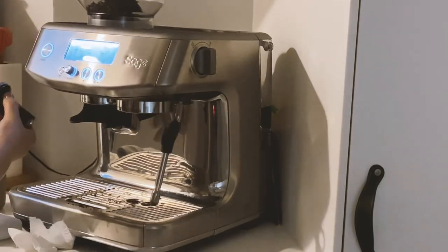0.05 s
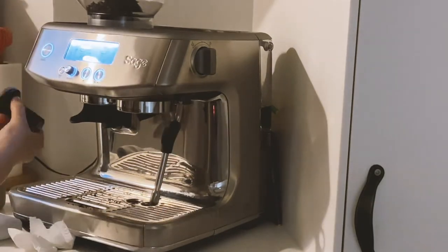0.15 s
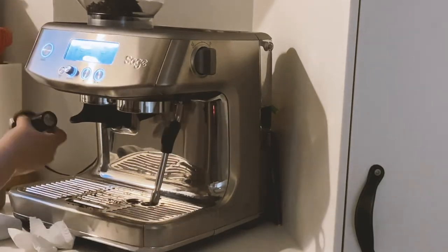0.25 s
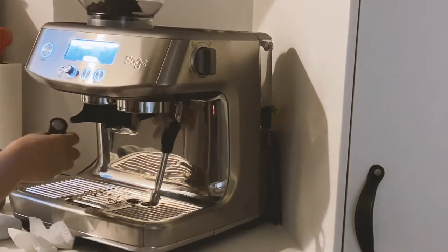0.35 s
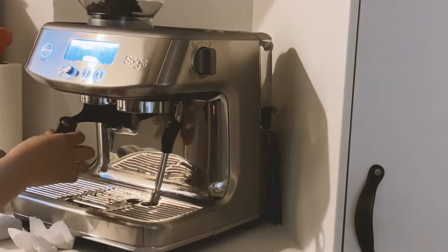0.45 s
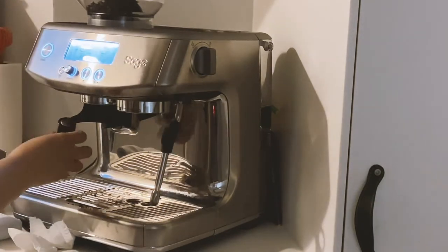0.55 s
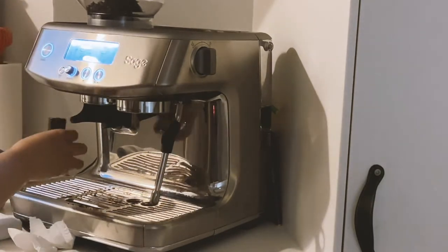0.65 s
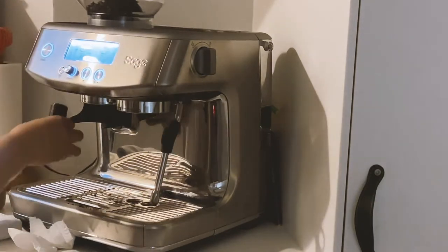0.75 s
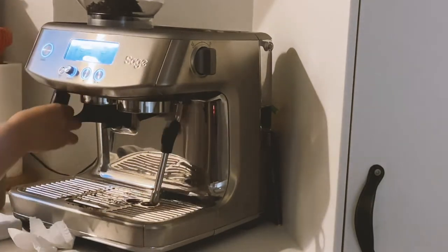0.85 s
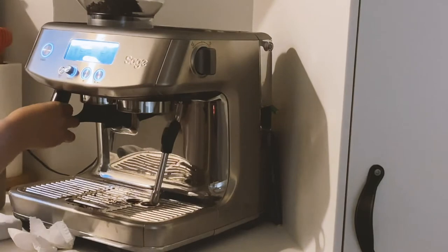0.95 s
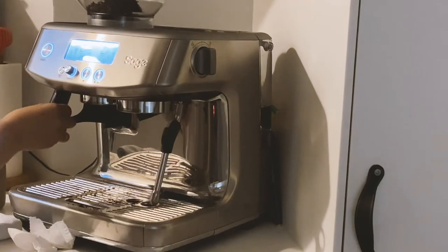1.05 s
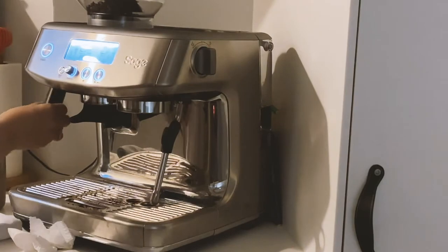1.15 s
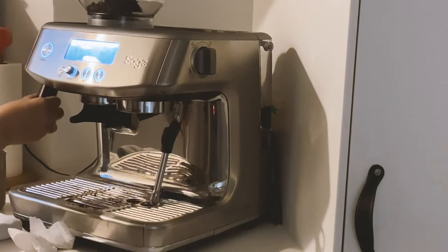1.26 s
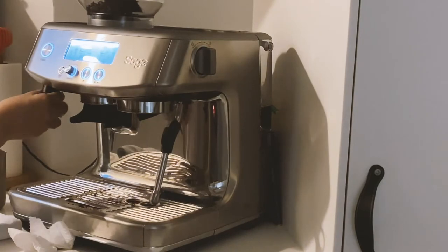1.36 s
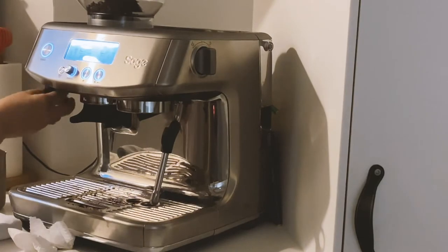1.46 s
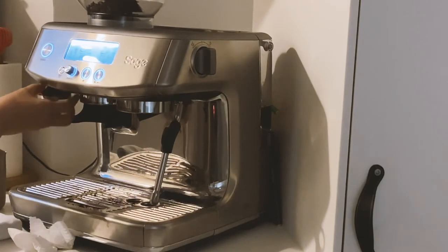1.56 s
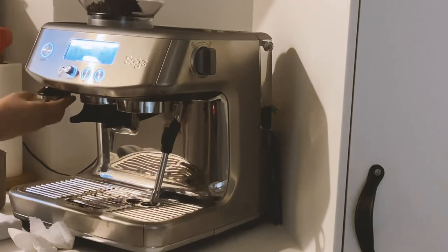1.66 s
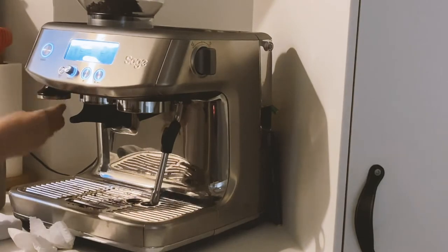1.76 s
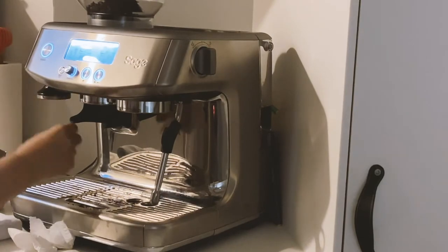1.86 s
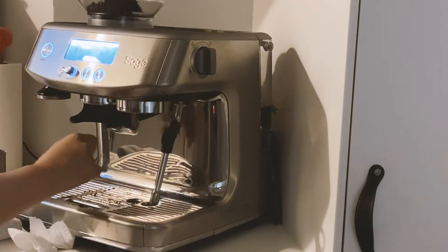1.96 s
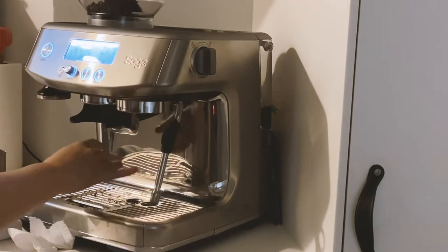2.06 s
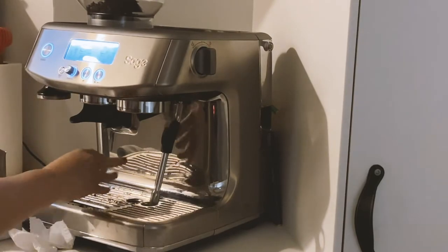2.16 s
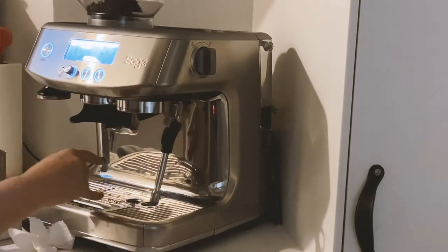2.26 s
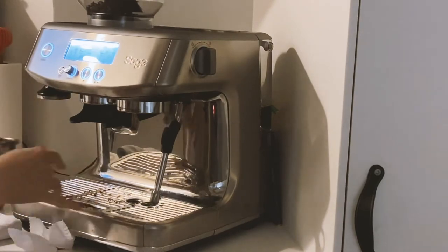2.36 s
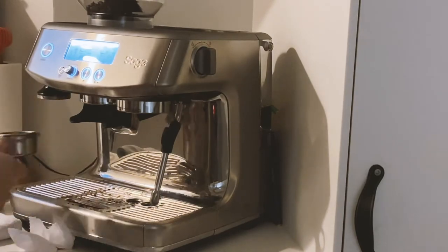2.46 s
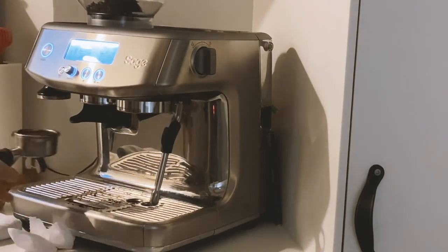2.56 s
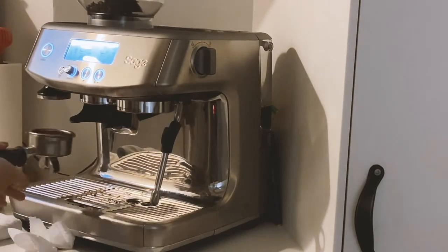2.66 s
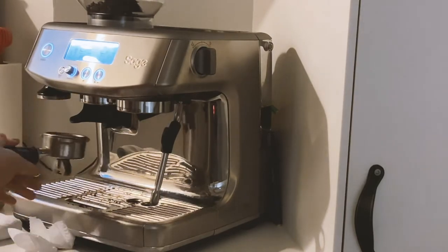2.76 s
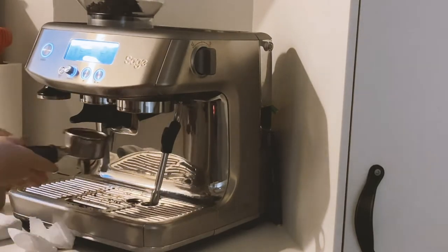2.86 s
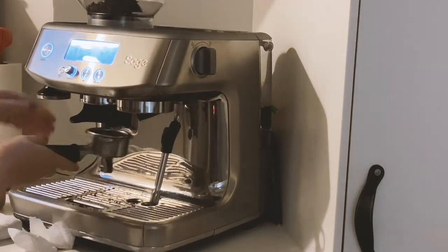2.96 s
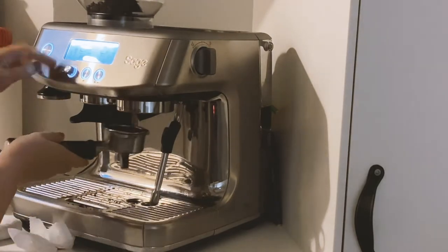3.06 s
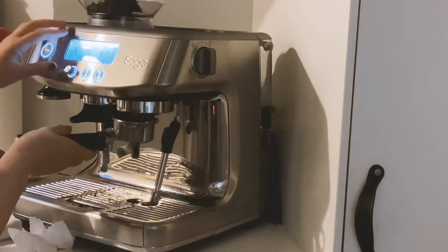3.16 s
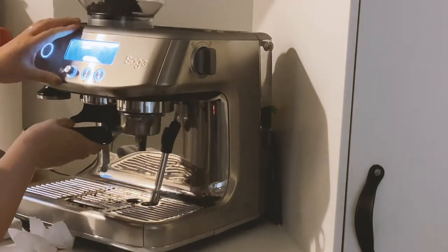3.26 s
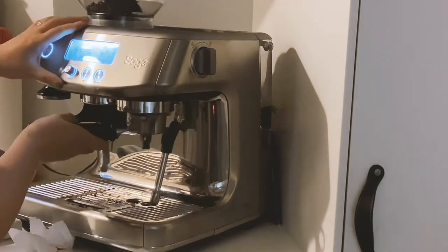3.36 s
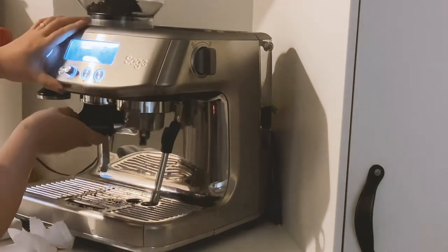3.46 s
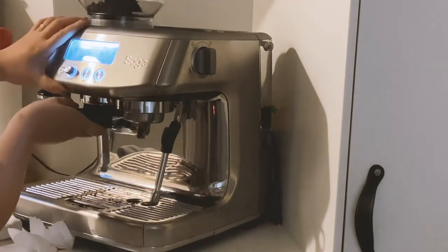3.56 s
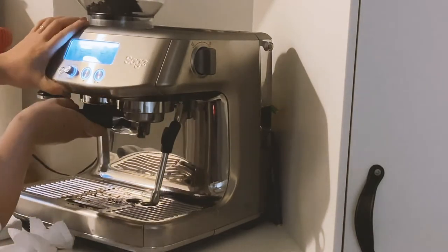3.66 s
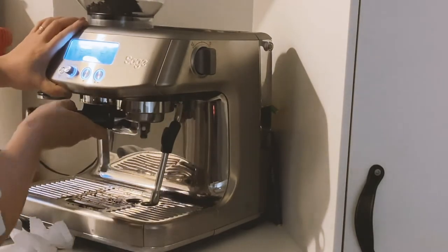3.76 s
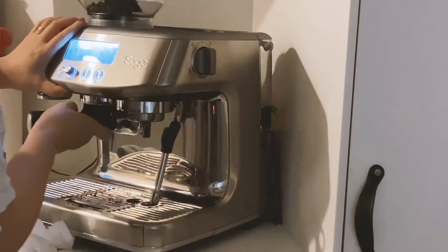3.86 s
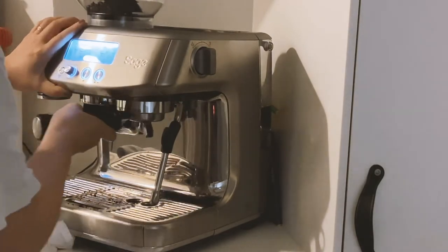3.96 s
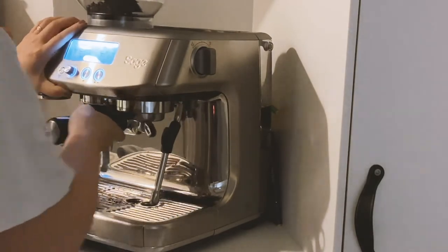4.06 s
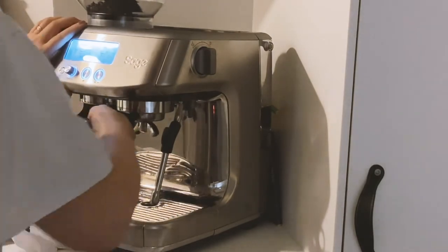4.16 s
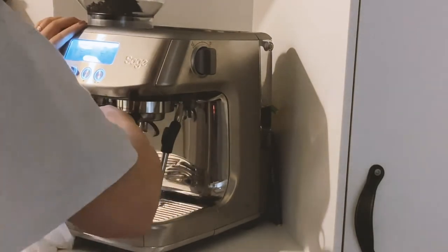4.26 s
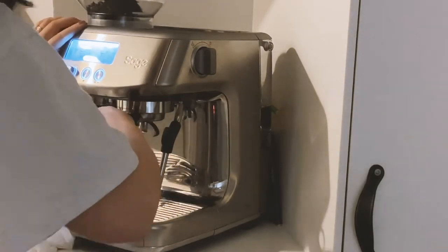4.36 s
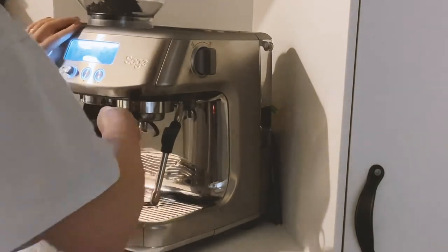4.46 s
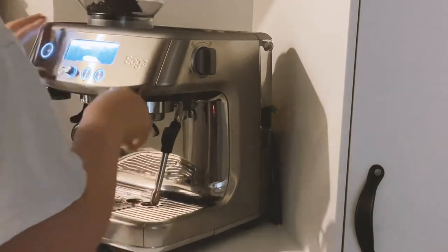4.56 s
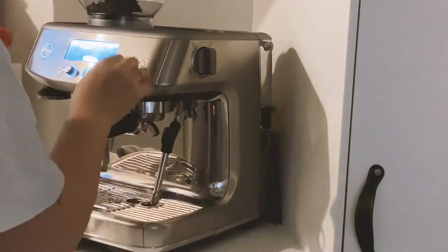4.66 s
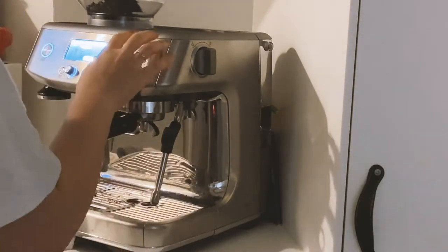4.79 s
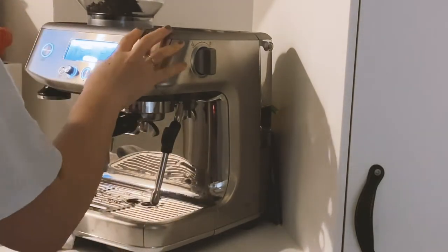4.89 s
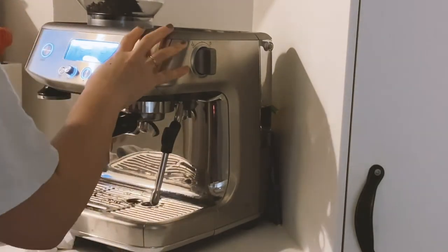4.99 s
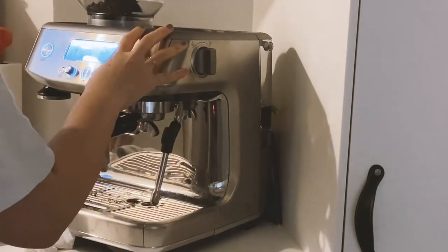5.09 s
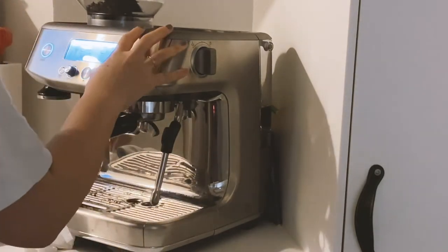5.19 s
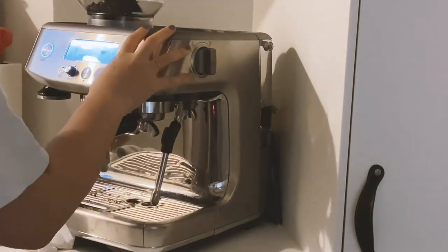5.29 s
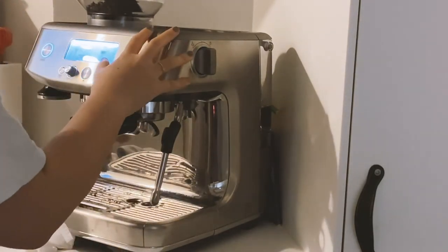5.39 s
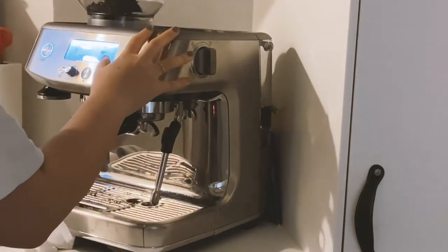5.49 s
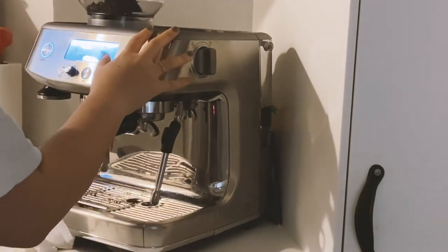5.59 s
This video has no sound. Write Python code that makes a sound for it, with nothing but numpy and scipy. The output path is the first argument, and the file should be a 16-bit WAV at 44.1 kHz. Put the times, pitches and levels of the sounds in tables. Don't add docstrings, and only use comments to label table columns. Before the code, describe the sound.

Hollow metallic knocks, a short rattling scrape, small rubber squeaks and a button click at an espresso machine, above a steady low compressor hum.

```python
import sys
import numpy as np
from scipy import signal
from scipy.fft import rfft, irfft
from scipy.io import wavfile
from scipy.ndimage import uniform_filter1d

SR = 44100
rng = np.random.default_rng(int(sys.argv[2]) if len(sys.argv) > 2 else 0)


def level_to_linear(level):
    exponent = np.asarray(level, float) / 20
    return 10 ** exponent


def int16_out(signal):
    q = np.round(np.clip(np.atleast_2d(signal).T, -1, 1) * 32767)
    wavfile.write(sys.argv[1], SR, q.astype(np.int16))


N = 248283
T = np.arange(N) / SR
HZ = np.fft.rfftfreq(N + SR, 1 / SR)


def unit(x):
    return x / np.sqrt(np.mean(x ** 2))


def band(x, lo_hz, hi_hz, order=2):
    return signal.sosfilt(signal.butter(order, [lo_hz, hi_hz], "band", fs=SR, output="sos"), x)


def walk(rate_hz):
    k = int(SR / rate_hz)
    return unit(uniform_filter1d(uniform_filter1d(rng.standard_normal(N), k), k))


def grains(rate_hz, spread_db):
    clicks = (rng.random(N) < rate_hz / SR) * rng.standard_normal(N)
    return unit(clicks * level_to_linear(spread_db * rng.exponential(size=N)))


def strokes(rows, rel=False):
    roundness = 1.1
    t, out = T[::16], 0
    for s, rise_s, fade_s, db, *more in rows:
        away = np.abs(t - s) / np.where(t < s, rise_s, fade_s)
        level_db = db + (more[0] if rel else 0)
        out = out + level_to_linear(level_db) * np.exp(-away ** roundness)
    return np.interp(T, t, out)


def hum():
    # t/s, shaft rate f/Hz, level/dB, lean to even orders/dB
    shaft = [(0, 22.39, -2.5, 13.5), (.6, 21.82, -0.5, 8), (1.2, 21.23, 3.5, 5), (1.7, 21.47, -1.5, -4),
             (2.399, 21.46, 0.5, -2), (3.0, 21.16, -0.5, -5.5), (3.799, 20.58, 2.5, 2.5),
             (4.1, 20.7, -2, -8), (4.6, 21.28, -2, -4), (5.0, 20.68, -0.5, -1.5), (5.63, 20.96, -12.5, -4)]
    # order, level/dB, share of lean
    orders = [(2, -61.5, 0.86), (3, -54.5, -0.82), (4, -59, .5), (5, -75, 0.01), (6, -63.5, 0.22),
              (7, -68.5, -0.29), (9, -75.5, -0.26), (10, -80.5, -0.81)]
    # t/s, rise/s, fade/s, level/dB
    swell = [
        (4.2, 0.55, 0.48, -80),
    ]
    steady_whine_db = -92
    s, *columns = np.transpose(shaft)
    hz, level_db, lean_db = (np.interp(T, s, c) for c in columns)
    phase = 2 * np.pi * np.cumsum(hz) / SR
    lines = 0
    for k, db, share in orders:
        line_db = db + level_db + share * lean_db + 2.2 * walk(16)
        lines = lines + np.sqrt(2) * level_to_linear(line_db) * np.cos(np.round(k) * phase + 0.91 * walk(0.93))
    whine_level = level_to_linear(steady_whine_db + level_db) + strokes(swell)
    return lines + whine_level * unit(band(rng.standard_normal(N), 2080, 2300))


def air():
    # f/Hz, density/dB per Hz
    spectrum = [(12, -39.5), (20, -6.5), (49, 1.5), (81, -6), (150, -20.5), (270, -33), (660, -42.5),
                (1400, -46.5), (1810, -51), (2390, -46.5), (3250, -51), (7310, -56), (8890, -61.5),
                (11100, -58), (16000, -78.5)]
    hz, db = np.transpose(spectrum)
    colour = level_to_linear(np.interp(np.log(HZ + 1), np.log(hz), db))
    noise = irfft(rfft(rng.standard_normal(N + SR)) * colour, N + SR)[:N]
    return level_to_linear(-50.5 - 4.0) * unit(noise)


def ring(modes, chance, damp, crack, spread, rise_s, tilt_db=0):
    t = T[:SR // 5]
    hz, width_hz, db = np.array(modes, float).T[:, :, None]
    db = db + tilt_db * np.log2(hz / hz.mean())
    sign = (-1.) ** np.arange(len(modes))[:, None]
    detune, strength = chance[:, :len(modes), None]
    hz = hz * (1 + .015 * detune)
    waves = sign * level_to_linear(db) * np.sin(2 * np.pi * hz * t)
    tones = level_to_linear(2.5 * strength) * waves * np.exp(-np.pi * damp * width_hz * t)
    contact = waves * np.exp(-np.pi * spread * width_hz * t)
    swell = (1 - np.exp(-t / rise_s)) ** 2
    y = unit(tones.sum(axis=0) * swell) + crack * unit(contact.sum(axis=0) * swell)
    return y / np.sqrt(np.sum(y ** 2))


def thump(chance):
    # f/Hz, width/Hz, level/dB
    counter_modes = [
        (89, 19, -7),
        (145.9, 30, -1.5),
    ]
    return level_to_linear(24) * ring(counter_modes, chance, damp=1.0, crack=0.77, spread=1.0, rise_s=.005)


def blows(events, casing, clack, tick, weight_db):
    # f/Hz, width/Hz, level/dB
    edge_modes = [(11100, 370, 2.5), (11940, 170, -8), (12450, 950, -5.5), (13860, 158, -10),
                  (15660, 350, -1.5)]
    out = np.zeros((4, N + SR))
    for s, casing_db, clack_db, tick_db, top_db in events:
        chance = rng.standard_normal((2, 8))
        low = level_to_linear(weight_db) * thump(chance)
        top = level_to_linear(24.5 + top_db) * ring(edge_modes, chance, damp=1.0, crack=5.3, spread=7.4, rise_s=.00008)
        body = level_to_linear(19.5) * ring(casing, chance, damp=1.0, crack=0.96, spread=2.9, rise_s=0.0018)
        hardness_db = 0.17 * (tick_db - clack_db + 15)
        panel = level_to_linear(21.5 + clack_db) * ring(clack, chance, damp=1.0, crack=1.4, spread=6.1, rise_s=0.00025,
                                            tilt_db=hardness_db)
        steel = level_to_linear(21 + tick_db) * ring(tick, chance, damp=.9, crack=1.6, spread=5.0, rise_s=.0002)
        start = int((s - .002) * SR)
        out[:, start:start + len(low)] += level_to_linear(casing_db) * np.array([low + top, body, panel, steel])
    return out[:, :N]


def struck_parts():
    # t/s, casing/dB, clack rel/dB, tick rel/dB, top rel/dB
    tamper = [
        (0.798, -17, -8, -21, -29.5),
        (1.413, -16, -7, -7.5, -9.5),
        (1.44, -30.5, -1, -23, -20.5),
    ]
    basket = [(2.948, -38.5, 0.5, -2, -2), (3.131, -18, -13.5, -27.5, -32), (3.238, -31.5, -38, -27, -28),
              (3.284, -18.5, -14.5, -32, -40), (3.374, -22.5, -24, -28.5, -34.5),
              (3.408, -20, -15.5, -23.5, -34), (3.458, -40.5, -27, -31, -22), (3.697, -30, -15.5, -29, -41),
              (3.756, -54, -1, 0, -4), (3.847, -42.5, -0.5, -6, -22), (3.872, -63, -10, -24, 3),
              (3.965, -47.5, -2.5, -3, -2.5), (4.066, -53.5, 8, 1, -5), (4.082, -49.5, -1, 7, -1.5),
              (4.245, -73, 1, -13, -19.5), (4.272, -72, -12, -17, -13)]
    button = [
        (0.766, -65.5, -0.5, -26, -40),
        (4.953, -38, -18.5, -60, -54.5),
        (5.107, -25.5, -7, -23, -8),
    ]
    slot = [(1.139, -40.5, 1, -28, -45.5), (1.154, -35, -5, -32.5, -45), (1.184, -31.5, -3, -41, -49),
            (1.23, -23, 0.5, -28, -38), (1.293, -26.5, -6, -38.5, -46.5), (1.312, -33, -3, -37, -46.5),
            (1.347, -34, -10, -31, -40.5)]
    latch = [
        (5.044, -52, 11, -6.5, -14),
    ]
    # f/Hz, width/Hz, level/dB
    casing = [
        [(252.4, 19, -8.5), (325, 19, -10), (437, 33, 0.5), (566.7, 18, -1.5), (630, 28, 7), (634.6, 45, 11.5),
         (773, 20, -12)],
        [(232, 12, -14), (286.8, 19.2, -2.5), (314.3, 25.5, 0), (364, 32, 1), (446, 25, -3),
         (473.6, 6.2, -13.5), (559, 22.5, -5), (690.6, 23, -12)],
        [(270, 36.5, 0), (367, 40, -2), (433.6, 24, 0.5), (490, 30, -19), (558, 30, -0.5), (690, 74, -2.5)],
    ]
    clack = [
        [(935, 36, 1.5), (1090, 54, 4.5), (1370, 75, 0.5), (1667, 50, -3.5), (2020, 53, -1), (2460, 55, -2),
         (2660, 45, -10.5), (3030, 94, -7)],
        [(760, 96, 2.5), (984, 78, 5.5), (1121, 95, 5), (1630, 130, -3), (1970, 180, 0), (2800, 210, -12)],
        [(753, 117, -13.5), (1136, 69, -1), (1800, 175, -2), (2205, 90, 1), (2540, 150, -1), (3174, 60, -7),
         (4020, 86, -10)],
    ]
    tick = [
        [(3770, 210, -1.5), (4460, 250, -5), (5210, 248, -1.5), (6030, 250, -0.5), (7200, 250, -1),
         (8450, 180, -2)],
        [(3350, 394, 1.5), (4490, 260, -2.5), (5670, 460, 2), (6790, 340, -1.5), (8900, 410, 4.5)],
        [(4800, 262, -4), (6020, 320, 5), (7335, 510, 1.5), (8000, 430, -1)],
    ]
    # f/Hz, width/Hz, level/dB
    slot_clack = [(1006, 32, -1.5), (1159, 15, -7.5), (1380, 54, -3), (1700, 43, -2), (1890, 36, -10.5),
                  (2080, 37, -9), (3550, 36, -25.5)]
    latch_clack = [(1150, 140, -6.5), (1670, 170, -7.5), (2640, 160, 0.5), (3150, 180, -2), (3720, 165, -3),
                   (4040, 150, -6)]
    weight_db = [
        -22,
        -9,
        -8.5,
    ]
    struck = [*zip([tamper, basket, button], casing, clack, tick, weight_db),
              (slot, casing[0], slot_clack, tick[0], -20),
              (latch, casing[2], latch_clack, tick[2], -12)]
    return sum(blows(*part) for part in struck)


def slides():
    # hardest t/s, rise/s, fade/s, drag level/dB, brightness rel/dB
    drags = [(.79, .006, 0.0054, -51.5, 7), (1.125, 0.022, .03, -39.5, -11.5), (1.19, 0.022, 0.01, -50, 17),
             (1.26, 0.034, 0.063, -35.5, -0.5), (1.4, 0.02, .006, -32.5, -5.5), (2.35, .2, 0.13, -79, 9.5),
             (3.23, .02, 0.048, -47, -3.5), (3.42, 0.027, 0.012, -30.5, -1), (3.56, .04, 0.03, -79, 3.5),
             (3.715, 0.0037, 0.048, -51, 2), (3.9, 0.063, 0.058, -57.5, 6.5),
             (4.09, 0.05, 0.029, -54.5, 9.5), (4.17, 0.033, .08, -75, 11.5), (4.32, 0.046, 0.05, -68.5, 0),
             (4.965, 0.011, 0.042, -46, -40), (5.08, 0.045, 0.01, -55, 9), (5.24, 0.15, 0.029, -47.5, -2.5)]
    slips = grains(450, 2.6)
    dull = level_to_linear(-6.5) * strokes(drags) * unit(band(slips, 300, 900, order=3))
    bright = level_to_linear(-10.5) * strokes(drags, rel=True) * unit(band(slips, 800, 2400, order=3))
    return dull + bright


def rustle():
    # hardest t/s, rise/s, fade/s, level/dB, duller part rel/dB
    brushes = [(1.15, 0.11, 0.032, -78, -8), (1.385, 0.051, 0.019, -56, 9.5), (1.655, 0.0049, .02, -81, 8),
               (1.734, 0.018, .015, -61, -9), (1.806, 0.01, 0.038, -62.5, -0.5),
               (1.982, 0.053, 0.018, -60.5, 1), (2.105, .012, 0.14, -71.5, -1.5),
               (2.56, .08, .1, -86.5, -6), (2.695, 0.011, 0.11, -79, -9.5), (3.56, 0.0071, 0.14, -71, 7),
               (3.78, 0.13, .03, -66, 12), (3.872, 0.0023, 0.0024, -38.5, 8.5),
               (3.963, .015, 0.046, -79, 3), (4.084, .012, .035, -77, 3), (4.384, 0.056, 0.013, -60, 3),
               (4.81, 0.014, .04, -63, 2.5), (5.25, 0.05, 0.041, -64, 8.5)]
    fibres = grains(6000, 2.5) * level_to_linear(1.5 * walk(25))
    crisp = level_to_linear(0.5) * strokes(brushes) * unit(band(fibres, 8000, 20000))
    dull = level_to_linear(-11.5) * strokes(brushes, rel=True) * unit(band(fibres, 2130, 10000))
    return crisp + dull


def thuds():
    # t/s, level/dB
    rocks = [
        (1.415, -25),
        (1.438, -47),
        (3.236, -33.5),
        (3.406, -25.5),
        (3.458, -41.5),
        (3.517, -59),
        (3.698, -46),
        (4.271, -53),
        (4.788, -52.5),
        (4.953, -46),
    ]
    pushes = np.zeros(N)
    for s, db in rocks:
        pushes[int((s - .002) * SR)] = level_to_linear(db)
    return signal.fftconvolve(pushes, thump(np.zeros((2, 2))))[:N]


def squeaks():
    # hardest t/s, fade/s, slip rate f/Hz, level/dB, overtones rel/dB
    slips = [(3.633, .006, 1800, -82, 11), (3.654, 0.012, 1900, -62.5, -1), (3.69, .01, 2030, -78, 14),
             (3.838, 0.0052, 2330, -48, -8), (3.858, 0.011, 2490, -46, -14),
             (3.899, 0.016, 2246, -44.5, -16), (3.945, .012, 2530, -59, -18),
             (4.005, .022, 2486, -51.5, -15.5), (4.062, 0.0063, 2458, -55, -18)]
    rise_per_fade = 0.94
    rows = np.array(slips)
    haste = np.interp(T, [3.72, 3.82, 3.95, 3.98], [.02, .037, .034, .016])
    slip_hz = np.interp(T, rows[:, 0], rows[:, 2]) * (1 + haste * walk(220))
    phase = 2 * np.pi * np.cumsum(slip_hz) / SR
    levels = [(s, rise_per_fade * fade_s, fade_s, db, rel_db) for s, fade_s, hz, db, rel_db in slips]
    overtones = sum(level_to_linear(db) * np.sin(k * phase) for k, db in enumerate([0.5, -5, -13], 2))
    strands = haste / haste.max() * (level_to_linear(-5) * np.sin(1.17 * phase) + level_to_linear(-12) * np.sin(.83 * phase))
    chatter = level_to_linear(4.5 * walk(90))
    return chatter * (strokes(levels) * (np.sin(phase) + strands) + strokes(levels, rel=True) * overtones)


def kitchen(x):
    # f/Hz, t60/s
    room = [(100, .45), (400, 0.44), (1500, 0.5), (5000, 0.53), (12000, 0.32)]
    room_hz, room_t60_s = np.transpose(room)
    t, tail = T[:SR * 2 // 3], 0
    for hz in 70 * 2 ** np.arange(0, 8, .5):
        t60_s = np.interp(np.log(hz), np.log(room_hz), room_t60_s)
        late = np.exp(-np.log(1000) * t / t60_s) / np.sqrt(t60_s)
        alcove = 0.66 * np.exp(-np.log(1000) * t / 0.1)
        echoes = band(rng.standard_normal(SR), hz / 2 ** 0.36, hz * 2 ** 0.3)[-len(t):]
        evenness = uniform_filter1d(echoes ** 2, size=int(8 * SR / hz)) / np.mean(echoes ** 2)
        tail = tail + echoes * evenness ** -.4 * (late + alcove)
    tail = tail * (1 - np.exp(-t / 0.0011))
    tail = tail / np.sqrt(np.sum(tail ** 2))
    tail[0] += level_to_linear(-6.2)
    return signal.fftconvolve(x, tail)[:N]


def scene():
    counter, *knocks = struck_parts()
    rubbing = slides() + squeaks() + rustle()
    in_room = sum(kitchen(part) for part in [counter + thuds(), *knocks, rubbing])
    return (in_room + hum() + air())[None]


def top_cut(x):
    return signal.sosfilt(signal.butter(12, 16650, fs=SR, output="sos"), x)


def record(dry):
    # f/Hz, width/Hz, level/dB
    gaps = [
        (8950, 230, -60),
        (13200, 170, -50),
    ]
    low_hz, high_hz = 35, 15900
    gap_db = sum(db * np.exp(-np.abs(HZ - hz) / width_hz) for hz, width_hz, db in gaps)
    edges = 1 / (1 + (low_hz / (HZ + 1)) ** 4) / (1 + (HZ / high_hz) ** 60)
    padded = np.pad(dry, ((0, 0), (SR // 2, SR - SR // 2)), mode="reflect")
    heard = irfft(rfft(padded) * level_to_linear(gap_db) * edges, N + SR)[:, SR // 2:SR // 2 + N]
    return top_cut(heard)


dry = scene()
out = record(dry)
int16_out(out)
```